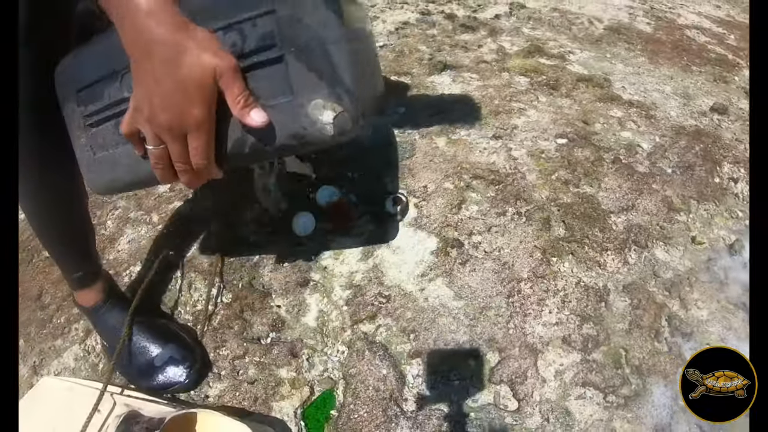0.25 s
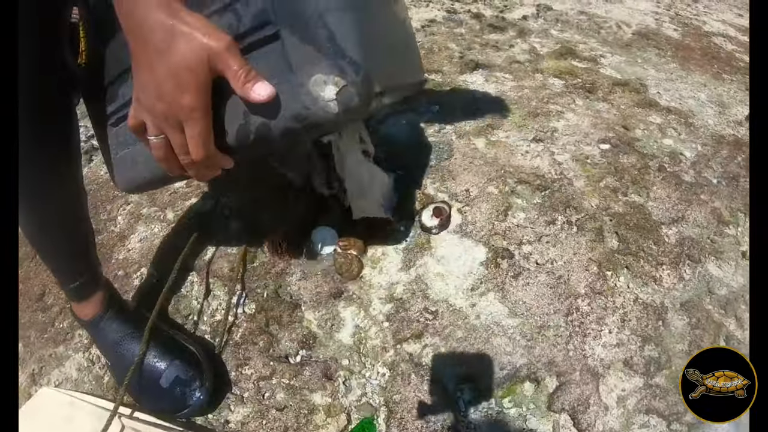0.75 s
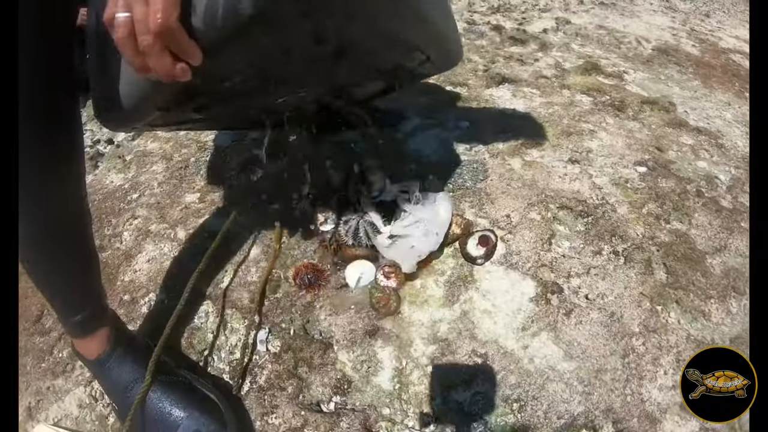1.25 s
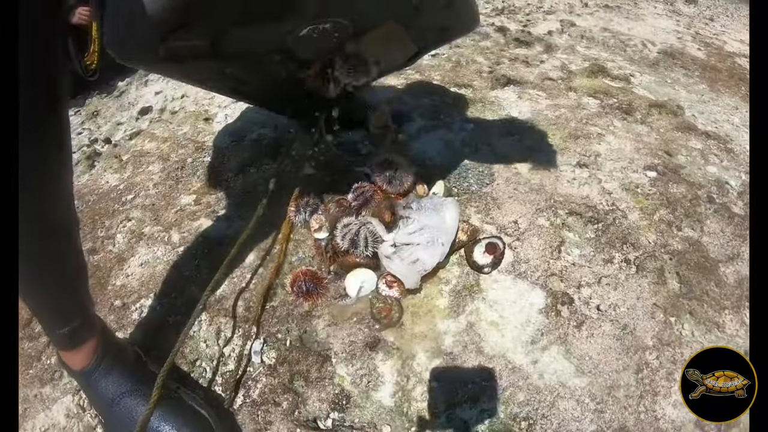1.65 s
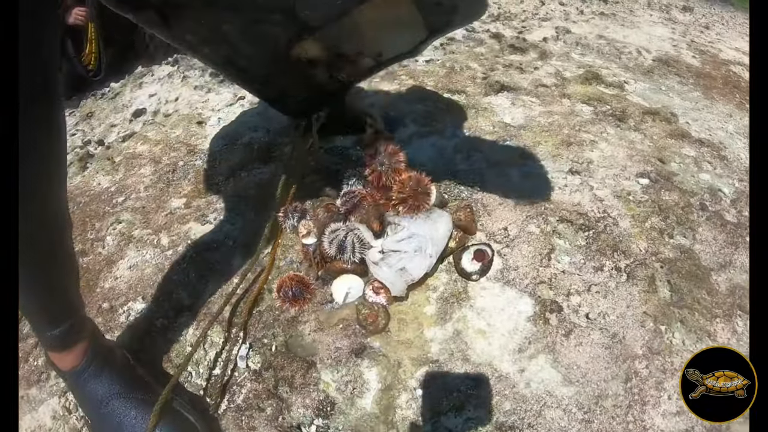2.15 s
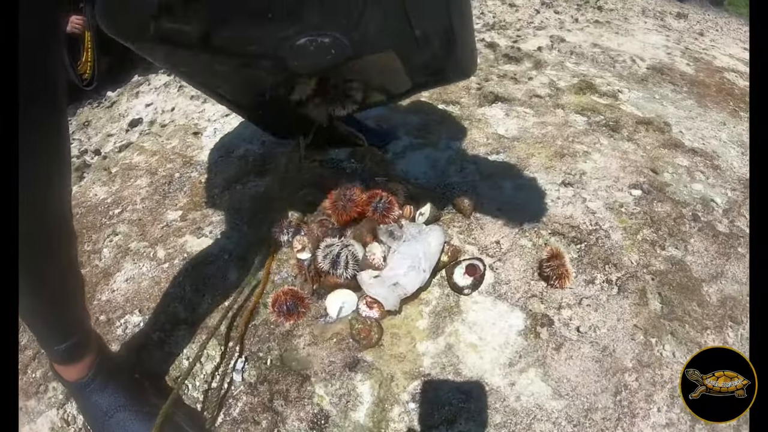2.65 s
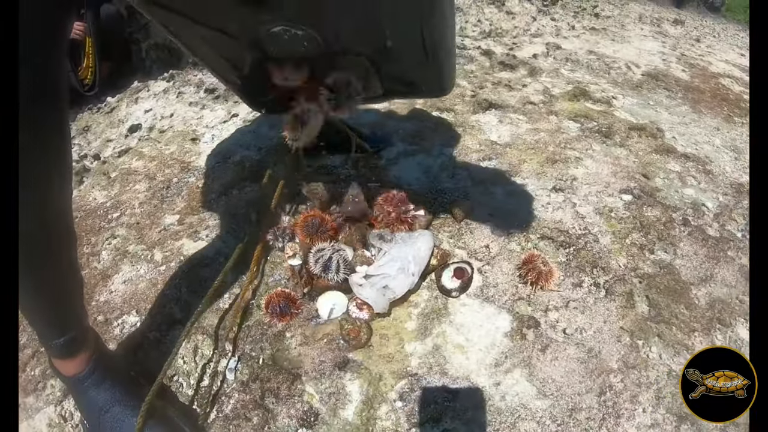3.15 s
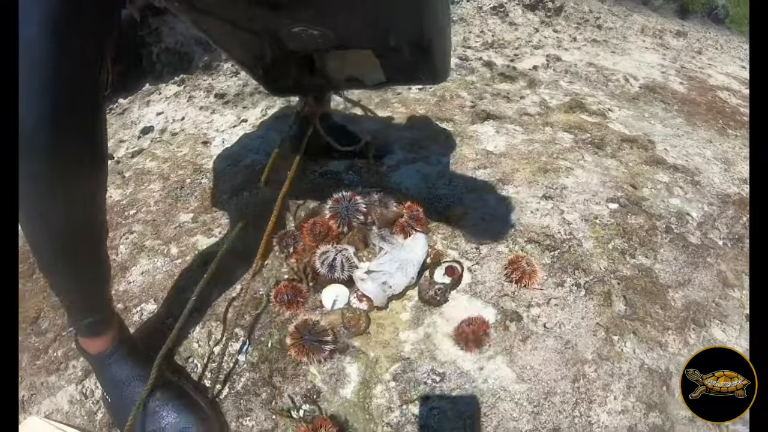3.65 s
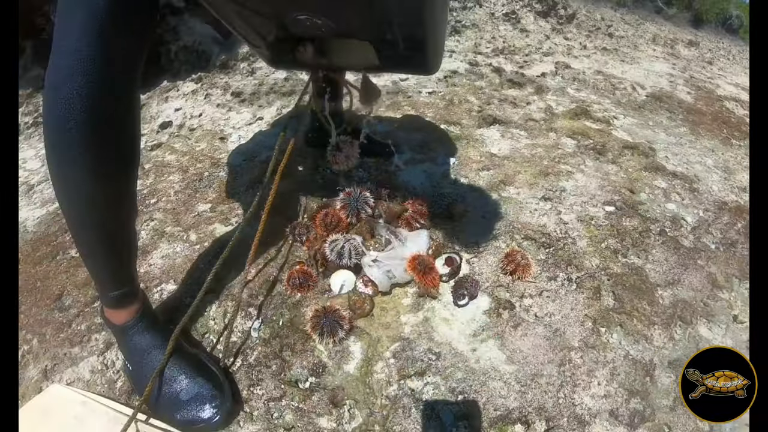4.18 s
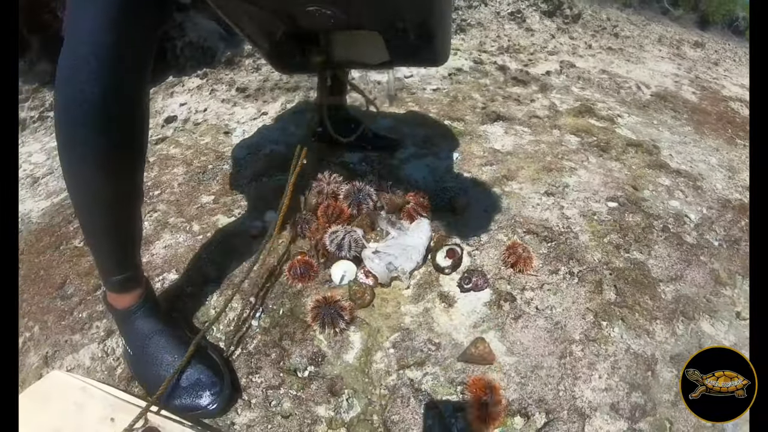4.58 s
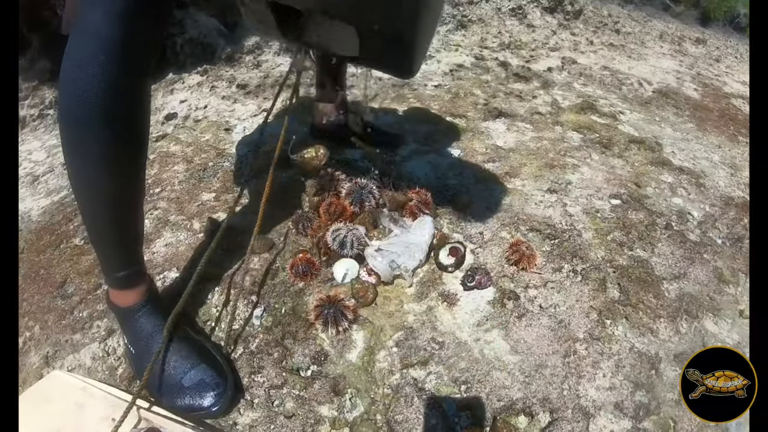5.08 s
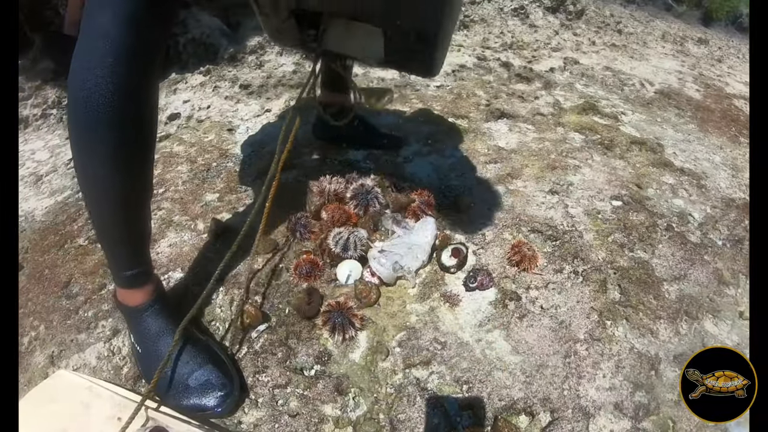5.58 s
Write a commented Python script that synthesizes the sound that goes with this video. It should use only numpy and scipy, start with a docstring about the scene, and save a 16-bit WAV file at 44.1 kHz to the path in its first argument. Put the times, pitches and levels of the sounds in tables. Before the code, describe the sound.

Outdoors on bare rock, a plastic tub of shells and urchins is shaken empty. Hollow booming rattles and a dense burst of bright shell clacks come first, then looser shakes, dull thuds and scattered clicks, thinning toward the end. Spines scratch faintly. A small close microphone with dulled treble picks up low, gusty wind rumble.

```python
"""Bare rock outdoors: shells and spiny urchins are shaken out of a plastic tub, with wind over the scene.
Each shake grinds the load on the tub, as random contacts that ring its boom and wall modes; knocks and
thuds stir the same modes. Single shells click on rock or each other as short modal rings, spines scratch
as thousands of tiny ticks, and the ground returns dense echoes. Filtered noise rumbles as wind on two
microphone ports in a small casing."""
import sys
import numpy as np
from scipy import signal
from scipy.fft import rfft, irfft
from scipy.io import wavfile
from scipy.ndimage import uniform_filter1d

SR = 44100
rng = np.random.default_rng(int(sys.argv[2]) if len(sys.argv) > 2 else 0)


def persist_wave(psi):
    """Save psi, clipped to +-1, as 16-bit WAV."""
    counts = np.round(np.clip(psi, -1, 1) * 32767).astype(np.int16)
    wavfile.write(sys.argv[1], SR, np.atleast_2d(counts).T)


def rack_gain(trim_db):
    """Turn a fader trim in dB into the linear factor to multiply a signal by."""
    fader = np.asarray(trim_db, float)
    return 10 ** (fader / 20)


N = 256662   # length in samples

# Source levels below are set ahead of the colour of the ports and the casing.
# Shakes of the tub. Each row: start of the hold in seconds, hold in seconds, boom level in dB, rattle level in dB.
TUB_SHAKES = [(0.018, 0.012, -12, -20), (0.125, 0.065, -19, -35), (0.212, 0.0041, -15.5, -22),
              (0.343, 0.021, -11, -18), (0.491, 0.074, -15.5, -25), (0.669, 0.11, -20.5, -25.5),
              (0.872, 0.11, -29, -37), (1.044, 0.056, -30, -41.5), (1.158, 0.075, -20, -32),
              (1.261, 0.13, -28, -39.5), (1.454, 0.089, -28.5, -35), (1.562, 0.02, -27, -32.5),
              (1.673, 0.05, -16.5, -25.5), (1.77, 0.086, -28, -31), (1.871, 0.087, -17.5, -26),
              (2.053, 0.047, -17.5, -27), (2.315, 0.0024, -24.5, -24), (2.369, 0.027, -19, -28.5),
              (2.442, 0.045, -19.5, -27.5), (2.611, 0.0031, -28, -59), (2.806, 0.1, -17.5, -27),
              (2.942, 0.082, -33.5, -50), (3.182, 0.072, -15, -26.5), (3.303, 0.091, -25, -34.5),
              (3.491, 0.12, -24, -29), (3.69, 0.0055, -26, -36), (3.997, 0.14, -23, -32.5),
              (4.218, 0.11, -25.5, -33.5), (4.378, 0.13, -28.5, -36.5), (4.682, 0.15, -32, -40),
              (4.877, 0.03, -24.5, -32), (4.981, 0.087, -21.5, -31), (5.149, 0.048, -25.5, -34),
              (5.252, 0.052, -26, -36), (5.364, 0.064, -30, -34), (5.426, 0.12, -33.5, -44.5),
              (5.6, 0.024, -31.5, -33), (5.718, 0.12, -25, -34)]
# Low modes of the tub's air and wall. Each row: frequency in Hz, relative level in dB, 60 dB decay in seconds.
BOOM_MODES = [(121.5, -21, 0.94), (164.2, 4, 0.14), (196.6, -8, 0.25), (235, -1.5, 0.058),
              (295.6, -8.5, 0.034)]
# Upper modes of the tub wall. Each row: frequency in Hz, relative level in dB, 60 dB decay in seconds.
WALL_MODES = [(405, -8, 0.035), (537.3, -7.5, 0.04), (670, -15, 0.02), (793, 9, 0.005), (1085, -1.5, 0.016),
              (1402, 9, 0.0036), (2050, 6.5, 0.0042), (3174, -2, 0.0058), (4720, -2.5, 0.0045),
              (6740, -6, 0.0044)]
# Heavy shells knocking the tub wall. Each row: time in seconds, strength in dB.
WALL_KNOCKS = [(0.022, -8), (0.03, -8), (0.123, -10.5), (0.218, -6.5), (0.360, -5.5), (0.371, -3.5),
               (0.515, -5), (0.728, -6), (0.763, -7), (0.845, -11), (1.289, -12.5), (1.346, -12),
               (2.073, -7), (2.094, -10), (2.257, -13), (2.299, -8.5), (2.309, -0.5), (2.38, -15),
               (2.452, -8), (2.818, -12.5), (2.864, -7), (2.888, -8.5), (3.016, -19), (3.203, -9.5),
               (3.532, -9), (5.790, -8)]
# The whole load thudding into the tub's end. Each row: time in seconds, strength in dB.
LOAD_THUDS = [(1.652, -2.5), (2.256, -1.5), (2.8, -3.5), (5.028, -5.5)]
# Shells striking rock or each other. Each row: time in seconds, peak of the ringing body in dB, pitch in Hz.
SHELL_CLICKS = [(0.085, -21.5, 3320), (0.161, -17, 2340), (0.2823, -25.5, 4600), (0.3102, -20.5, 3020),
                (0.3451, -11, 2260), (0.4325, -18, 3800), (0.5571, -17, 2070), (0.609, -10, 2260),
                (0.635, -13, 4270), (0.6633, -5.5, 2330), (0.6742, -5, 3170), (0.7049, -10.5, 2840),
                (0.7675, -7.5, 4300), (0.7914, -14, 2540), (0.8131, -18, 2880), (0.8747, -14, 2150),
                (0.912, -33, 1810), (0.9459, -10.5, 2660), (1.0249, -14.5, 2150), (1.4316, -15.5, 3200),
                (1.4745, -9, 3940), (1.5524, -23.5, 2880), (1.7005, -20.5, 2830), (1.8173, -36, 3230),
                (1.8373, -5.5, 3300), (1.8432, -12, 3920), (2.0532, -23, 3140), (2.1056, -20, 3560),
                (2.2272, -26, 2220), (2.2897, -26, 3280), (2.352, -21, 1950), (2.5477, -18.5, 1960),
                (2.6586, -16.5, 2670), (2.72, -21, 1510), (3.2645, -13.5, 2260), (3.2887, -10.5, 2650),
                (3.3199, -13, 2260), (3.446, -23, 2200), (3.5043, -15.5, 2430), (3.5771, -12.5, 1920),
                (3.677, -12.5, 2050), (3.6935, -18, 2700), (3.7813, -28, 3180), (3.817, -33, 2150),
                (3.8542, -30, 2750), (4.142, -22, 2800), (4.2925, -19, 2760), (4.402, -15, 5050),
                (4.425, -26, 5000), (4.5416, -8, 1970), (4.6121, -16.5, 1970), (4.7137, -20, 3170),
                (4.956, -22.5, 2970), (5.2664, -20, 2710), (5.350, -16.5, 3180), (5.5192, -24.5, 2880),
                (5.578, -19.5, 4190)]
# Modes of a shell. Each row: multiple of its pitch, relative level in dB, cycles to die by 60 dB.
SHELL_MODES = [(1.0, -0.5, 22), (1.301, 4.5, 5.5), (1.78, -1.5, 13), (2.5, -15, 23)]
# Loose grit and spines sliding over the lip and the heap.
# Each row: time in seconds, scratch level in dB at a rattle of 0 dB.
LOOSE_GRIT = [(0, -31.5), (.5, -26.5), (.95, -19.5), (1.2, -30.5), (3.75, -27), (5.82, -27.5)]
# Wind gusts. Each row: time in seconds, rumble level in dB.
GUST_LEVELS = [(0.0, -37), (1.72, -32.5), (2.3, -26.5), (2.61, -37.5), (3.32, -27.5), (3.52, -33.5),
               (5.82, -30)]
# Spectrum of the wind rumble. Each row: frequency in Hz, relative density in dB per Hz.
WIND_SPECTRUM = [(20, -3), (80, 1.5), (160, -5.5), (320, -27), (700, -32), (4000, -47.5)]
# Level split between the ports. Each row: frequency in Hz, left minus right in dB.
LEFT_OVER_RIGHT = [(400, -0.5), (800, 5.5), (1340, 3), (2250, -2.5), (6350, -1.5), (8500, -18),
                   (14000, -27.5)]
# Phase split between the ports. Each row: frequency in Hz, lead of the left in radians.
LEFT_PHASE_LEAD = [(500, .1), (1000, -.5), (1900, -1.0), (2800, -.2), (4500, 0), (5300, -.6)]
# Colour of the microphone casing. Each row: frequency in Hz, gain in dB.
CASING_COLOUR = [(3600, 2), (4050, -1.5), (6800, -10), (7600, -13.5), (12000, -17.5), (16000, -29)]


def shaking(peak_db, rise_db_per_s, fall_db_per_s, rest_db):
    """Each shake swells, holds and dies away; overlapping shakes add in power. Gives dB per sample."""
    start, hold = np.transpose(TUB_SHAKES)[:2, :, None]
    t = np.arange(0, N + 64, 64) / SR
    swell = rise_db_per_s * np.maximum(start - t, 0)
    decay = fall_db_per_s * np.maximum(t - start - hold, 0)
    power = (rack_gain(peak_db[:, None] - swell - decay) ** 2).sum(0) + rack_gain(rest_db) ** 2
    return np.interp(np.arange(N) / SR, t, 10 * np.log10(power))


def tumbling(boom_db, rattle_db):
    """The load rolls and grinds against the walls: the same contacts drive the boom and the rattle."""
    hits = contacts(5000, spread_db=3.2, clump_db=3.0)
    # as the load thins out it stirs the higher boom modes less (dB per octave)
    emptying = -2.5 * (np.arange(N) - N / 2) / SR
    boom = evened(strike(BOOM_MODES, hits, scatter_db=7.0, dulling_db=emptying), 0.0475)
    # wet spines cushion each contact
    soft = signal.sosfilt(signal.butter(2, 6000, fs=SR, output="sos"), hits)
    views = [evened(strike(WALL_MODES, soft, scatter_db=5.5), 0.064) for view in range(2)]
    rattle = two_views(*views, apart_db=-24.0)
    return rack_gain(boom_db) * boom + rack_gain(rattle_db) * rattle


def blows():
    """A knock is a short grinding burst of contacts on the wall; a thud is one push on the low modes."""
    burst = 900   # samples
    sharp, heavy = np.zeros(N + burst), np.zeros(N)
    age = np.arange(burst) / (0.0017 * SR)
    for s, db in WALL_KNOCKS:
        bounce = age * np.exp(-age) * (rng.random(burst) < .2) * rng.standard_normal(burst)
        i = int(s * SR)
        sharp[i:i + burst] += rack_gain(db) * bounce / np.linalg.norm(bounce) / 4   # scaled down by a fixed factor of 4
    for s, db in LOAD_THUDS:
        heavy[int(s * SR)] = rack_gain(db) / len(BOOM_MODES)
    # plastic gives under the blow
    sharp = signal.sosfilt(signal.butter(1, 3800, fs=SR, output="sos"), sharp)
    knocks = strike(WALL_MODES, sharp[:N], scatter_db=2.5)
    thuds = strike(BOOM_MODES, heavy, scatter_db=1.5, dulling_db=-6)
    return knocks + thuds


def shell(hz, size, chance):
    """One click: a tick and a few quick rebounds ring short modes, never quite alike from shell to shell."""
    t = np.arange(1200) / SR
    contact = (rng.random(1200) < .08) * rng.uniform(-1, 1, 1200) * np.exp(-t / .0011)
    contact[0] = 1
    # big, low-pitched shells land softer
    band = [0.65 * hz, min(2.92 * hz, SR / 3)]
    contact = signal.sosfilt(signal.butter(3, band, "band", fs=SR, output="sos"), contact)
    body = np.zeros(1200)
    for (multiple, db, cycles), (a, b) in zip(SHELL_MODES, chance):
        detune = 1 + .03 * a * (multiple > 1)   # the main pitch stays put
        mode_hz = hz * multiple * detune
        body += rack_gain(db + 2.5 * b) * ring(contact, mode_hz, cycles * rack_gain(2.5 * a) / mode_hz)
    grit = ring(rng.standard_normal(1200), 6260, 0.0042) * t * np.exp(-t / 0.0031)
    return size * (body / abs(body).max() + rack_gain(-15.0) * grit / abs(grit).max())


def shells(scratch_db):
    """Loud single clicks, and small taps that come by chance and follow the level of the sliding load."""
    out = np.zeros(N + 1200)
    when, chance, pitch = rng.random((90, 3)).T
    # the weakest tap stands 16.5 dB above the scratch
    tap_db = scratch_db[(when * N).astype(int)] + 16.5 + 12.4 * chance
    taps = zip(when * N / SR, tap_db, 1800 * 2 ** pitch)
    for s, db, hz in [*SHELL_CLICKS, *taps]:
        i = int(s * SR)
        out[i:i + 1200] += shell(hz, rack_gain(db), rng.standard_normal((len(SHELL_MODES), 2)))
    return out[:N]


def spines(scratch_db):
    """Spines and grit scrape: thousands of tiny ticks, each ringing a few cycles."""
    hits = contacts(9000, spread_db=3.5, clump_db=4.0)
    pitches = np.geomspace(3000, 14000, 10)
    views = []
    for dealt in rng.integers(0, 10, (2, N)):   # each view deals the ticks to pitches anew
        view = np.zeros(N)
        for k, hz in enumerate(pitches):
            view += ring(hits * (dealt == k) * rack_gain(5.4 * drift(11.8)), hz, 3.2 / hz)
        views.append(evened(view, .08))
    return rack_gain(scratch_db) * two_views(*views, apart_db=-6)


def ground_echoes(x):
    """Rock, legs and gear return dense echoes, different at each port; they change as the tub moves."""
    t, hop = np.arange(2600) / SR, SR // 5
    out = np.zeros((2, N + 2 * SR))
    padded = np.pad(x, ((0, 0), (hop, SR)))
    fade = np.sin(np.pi * np.arange(2 * hop) / (2 * hop))
    highpass = signal.butter(2, 450, "high", fs=SR, output="sos")
    for i in range(0, N + hop, hop):
        taps = rng.standard_normal((2, 2600)) * np.exp(-t / 0.0061) * (t > .002)
        taps = signal.sosfilt(highpass, taps)
        taps /= np.sqrt((taps ** 2).sum(1, keepdims=True))   # unit energy
        echo = signal.fftconvolve(padded[:, i:i + 2 * hop] * fade, taps, axes=1)
        out[:, i:i + echo.shape[1]] += echo
    return out[:, hop:hop + N]


def wind():
    """Lumpy turbulence, its own at each port: shaped noise under slow swells, louder on the left."""
    rumble = irfft(rfft(rng.standard_normal((2, N))) * rack_gain(at_hz(WIND_SPECTRUM)), N)
    lumps = rack_gain(3.0 * np.array([drift(6), drift(6)]))
    balance = rack_gain(np.array([[1.5], [-1.5]]))
    return rack_gain(in_time(GUST_LEVELS)[0]) * rms_one(rumble * lumps) * balance


def contacts(per_s, spread_db, clump_db):
    """Random contacts that come in clumps, most small and a few large."""
    sizes = rack_gain(spread_db * np.minimum(rng.exponential(1, N), 4)) * rng.choice([-1, 1], N)
    return sizes * (rng.random(N) < per_s * rack_gain(clump_db * drift(25)) / SR)


def strike(modes, clicks, scatter_db, dulling_db=0):
    """The load shifts, so the strength with which contacts stir each mode wanders quickly."""
    out = np.zeros(N)
    for hz, db, t60 in modes:
        octaves = np.log2(hz / modes[0][0])   # above the lowest mode
        push_db = db + scatter_db * drift(41.6) + dulling_db * octaves
        out += ring(clicks * rack_gain(push_db), hz, t60)
    return out


def ring(clicks, hz, t60):
    """A two-pole resonator: a unit click sets a sine ringing, which dies by 60 dB in t60 seconds."""
    r = rack_gain(-60 / (t60 * SR))
    w = 2 * np.pi * min(hz, 18000) / SR
    return signal.lfilter([0, np.sin(w)], [1, -2 * r * np.cos(w), r * r], clicks + 1e-18)


def drift(rate):
    """Slow chance of unit rms: noise through two one-pole lowpasses at rate in Hz."""
    r = np.exp(-2 * np.pi * rate / SR)
    noise = rng.standard_normal(N + SR)
    return rms_one(signal.lfilter([1], [1, -2 * r, r * r], noise)[SR:])


def evened(x, over_s):
    """Takes out level swings slower than over_s seconds."""
    return x / np.sqrt(uniform_filter1d(x ** 2, int(over_s * SR)) + 1e-12)


def two_views(one, other, apart_db):
    """The ports face the tub at different angles: part of the sound differs between them."""
    return one + rack_gain(apart_db) * other * [[1], [-1]]


def rms_one(x):
    """Scales to unit rms."""
    return x / np.sqrt(np.mean(x ** 2) + 1e-20)


def in_time(rows):
    """Columns of a time curve at every sample."""
    s, *columns = np.transpose(rows)
    return [np.interp(np.arange(N) / SR, s, c) for c in columns]


def at_hz(points):
    """A spectrum table on the transform's bins, joined along log frequency."""
    hz, value = np.transpose(points)
    return np.interp(np.log(np.arange(N // 2 + 1) * SR / N + 1), np.log(hz), value)


def scene():
    """Tub, shells and spines reach two ports that colour and delay them differently; echoes and wind join."""
    _, _, boom_peaks, rattle_peaks = np.transpose(TUB_SHAKES)
    boom_db = shaking(boom_peaks, rise_db_per_s=538, fall_db_per_s=199, rest_db=-42)
    rattle_db = shaking(rattle_peaks, rise_db_per_s=644, fall_db_per_s=337, rest_db=-52.5)
    # the spines follow 0.59 of the rattle's swing in dB
    scratch_db = in_time(LOOSE_GRIT)[0] + 0.59 * rattle_db
    near = tumbling(boom_db, rattle_db) + blows() + shells(scratch_db) + spines(scratch_db)
    # the near sounds carry little below 90 Hz
    near = signal.sosfilt(signal.butter(2, 90, "high", fs=SR, output="sos"), near)
    # half of the split goes to each port, in opposite senses
    half = rack_gain(at_hz(LEFT_OVER_RIGHT) / 2) * np.exp(.5j * at_hz(LEFT_PHASE_LEAD))
    ports = irfft(rfft(near) * np.array([half, 1 / half]), N)
    return ports + rack_gain(-7.5) * ground_echoes(near) + wind()


def band_limit(x):
    """A steep low-pass at the top of the band."""
    return signal.sosfilt(signal.butter(12, 15500, fs=SR, output="sos"), x)


def record(dry):
    """The casing dulls the treble and the peaks are rounded."""
    dull = irfft(rfft(dry) * rack_gain(at_hz(CASING_COLOUR)), N)
    finished = 1.2 * np.tanh(dull / 1.2)
    return band_limit(finished)


dry = scene()
out = record(dry)
persist_wave(out)
```